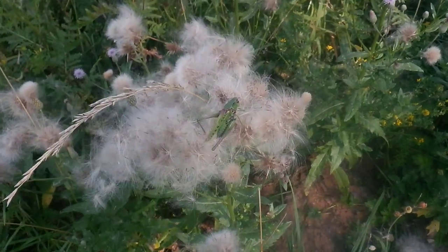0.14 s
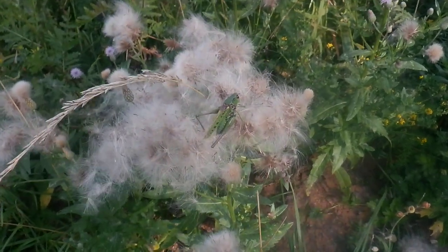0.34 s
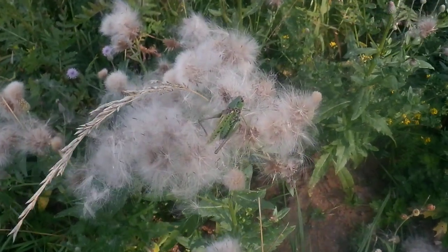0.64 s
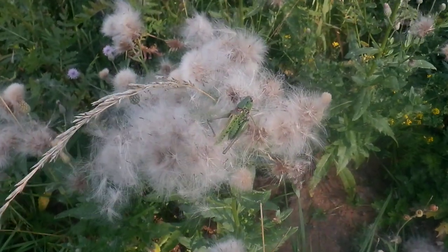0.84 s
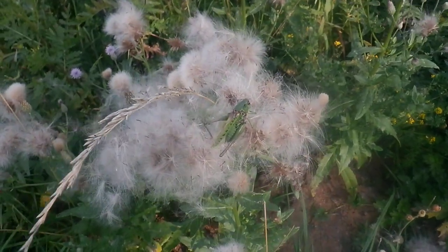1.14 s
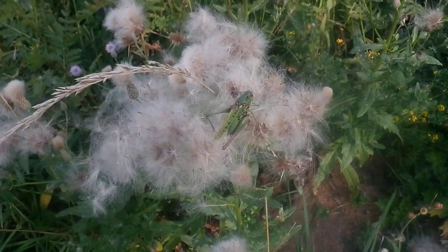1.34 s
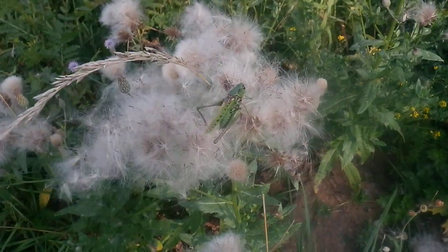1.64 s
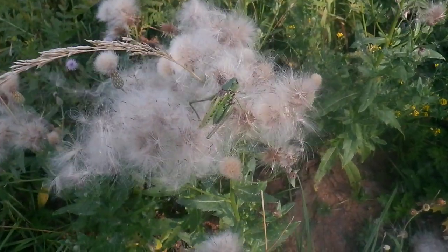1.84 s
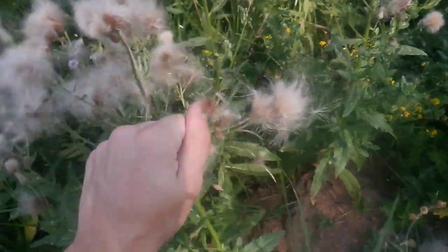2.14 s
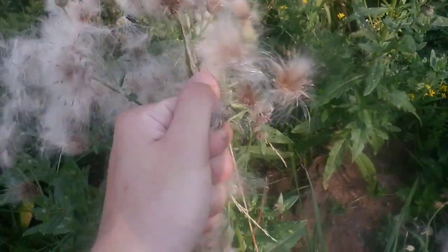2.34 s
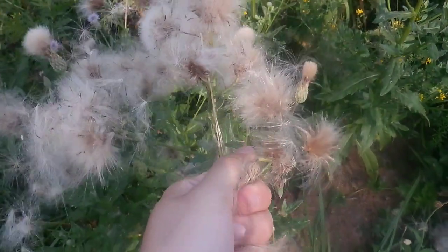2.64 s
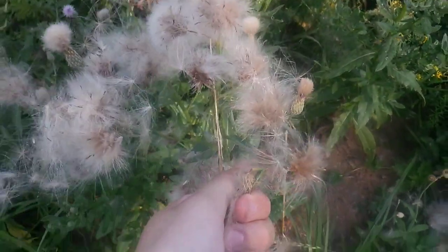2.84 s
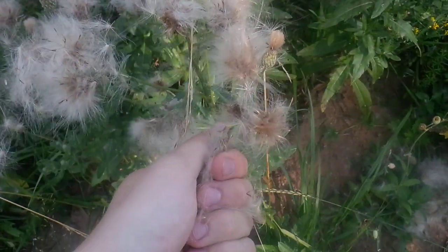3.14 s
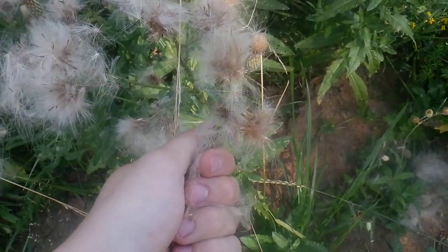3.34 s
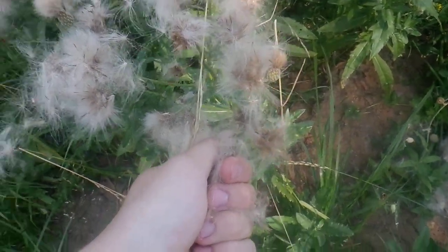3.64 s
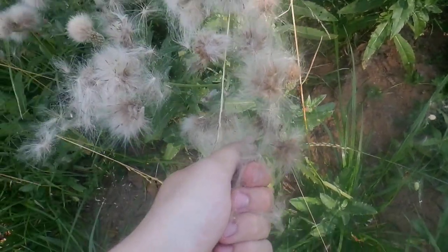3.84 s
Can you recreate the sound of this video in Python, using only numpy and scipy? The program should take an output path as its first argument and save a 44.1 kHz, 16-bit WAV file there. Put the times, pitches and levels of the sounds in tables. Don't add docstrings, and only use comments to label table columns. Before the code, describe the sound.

A bush-cricket chirrs in fast, steady high pulses, then stops as a hand rustles dry stems.

```python
import sys
import numpy as np
from scipy import signal
from scipy.io import wavfile

SR = 44100
rng = np.random.default_rng(int(sys.argv[2]) if len(sys.argv) > 2 else 0)


def store_wav(level_fs):
    pcm = np.round(np.clip(np.atleast_2d(level_fs), -1, 1) * 32767)
    wavfile.write(sys.argv[1], SR, pcm.T.astype(np.int16))


def ratio_of_db(decibels):
    return 10 ** (np.asarray(decibels, float) / 20)


N = 176400

# f/Hz, level/dB per Hz
MEADOW_SPECTRUM = [(35, -26), (60, -7), (96, -0.5), (885, 1), (1810, -7), (2900, -7), (4400, -10.5),
                   (5690, -8.5), (6800, -16.5), (8840, -53), (15000, -120)]
MEADOW_DB, HISS_DB = -54.5, -65.5
PORT_HZ, PORT_WIDTH_HZ, PORT_DB = 2932, 370, -58
# t/s, level/dB
RECORDER_GAIN = [
    (0, -1.5),
    (2.975, -0.83),
    (2.99, -22.5),
    (3.13, -15.5),
    (3.66, -6.5),
    (3.69, -17.5),
    (3.93, -13),
    (3.95, -20),
    (4, -12.5),
]

# t/s, level/dB
WIND_LEVEL = [(0, -58.5), (.55, -76), (.9, -64.5), (1.16, -68), (1.19, -50.5), (1.34, -56), (1.42, -65),
              (1.8, -72.5), (1.9, -53.5), (2.2, -62.5), (2.3, -56.5), (2.65, -52), (2.97, -42), (3.03, -61),
              (3.1, -75.5), (3.6, -68.5), (4, -74)]
# f/Hz, level/dB per Hz
WIND_SPECTRUM = [(12, -60), (20, -18), (76, -0.5), (145, -1.5), (400, -26), (520, -50), (880, -120)]
WIND_LUMP_DB = 4
# t/s, peak level/dB
WIND_PUFFS = [(1.185, -46), (1.208, -42), (1.241, -38), (1.288, -36.5), (1.329, -44), (1.984, -48),
              (2.04, -43.5), (2.176, -40.5), (2.624, -38), (2.668, -43), (2.768, -43), (2.815, -44.5),
              (2.89, -37), (3.014, -65)]
PUFF_HZ, PUFF_S = 141, 0.0244
# t/s, level/dB
GRIP_LEVEL = [(3.62, -75), (3.675, -40), (3.72, -37.5), (3.775, -50), (3.8, -33.5), (3.88, -34.5),
              (3.895, -47.5), (3.93, -51), (3.96, -61)]
# f/Hz, level/dB per Hz
GRIP_SPECTRUM = [(12, -56.5), (20, -23), (156, 2), (908, -24.5), (1800, -39.5), (3000, -61.5),
                 (3900, -74.5), (6600, -120)]

# t/s, level/dB
HAND_LEVEL = [(2.0, -51.5), (2.06, -46), (2.085, -36.5), (2.1, -33), (2.125, -42), (2.24, -44),
              (2.34, -52.5), (2.38, -58), (2.55, -56.5), (2.7, -51), (2.8, -56.5), (2.9, -55.5),
              (2.955, -52.5), (2.968, -40), (2.98, -32.5), (2.99, -66.5), (3.05, -63)]
# f/Hz, level/dB per Hz
RUSTLE_SPECTRUM = [(120, -32), (287, -8.5), (579, -7), (1430, -6), (1790, -10.5), (3000, -5), (5550, -15),
                   (8500, -32), (12000, -46), (15600, -61), (22000, -120)]
# t/s, level/dB
RUB_LEVEL = [(3.4, -70), (3.6, -70), (3.622, -39.5), (3.64, -32.5), (3.672, -36.5), (3.69, -38),
             (3.73, -83), (3.95, -85)]
# f/Hz, level/dB per Hz
RUB_SPECTRUM = [(210, -26), (350, 0.5), (835, -3), (1720, -10), (2070, -10), (9000, -44.5), (11700, -83),
                (19800, -120)]
GRAINS_PER_S, GRAIN_SPREAD_DB, GRAIN_DB = 1100., 4.5, 0.5

# t/s, peak level/dB, pitch f/Hz, length/ms
STEM_SNAPS = [(2.095, -39, 7500, 14), (2.13, -34, 3000, 2.0), (2.524, -40.5, 1080, 2.1),
              (2.579, -32.5, 5100, 2.0), (2.629, -34, 2160, 11.2), (2.629, -39.5, 1430, 9.0),
              (2.706, -36.5, 2900, 18), (2.259, -36, 1450, 65), (2.964, -36, 1200, 7), (3.407, -47, 880, 3),
              (3.9025, -48, 1200, 1.5), (3.96, -54, 1700, 8)]
SNAP_SPAN = 1.153

# t/s, dull level/dB, port level/dB, upper port level/dB
FIBRE_TICKS = [(2.204, -47, -38, -48), (2.328, -55, -45, -44), (2.407, -53, -41, -40),
               (2.494, -55, -50, -41), (2.547, -60, -52, -45), (2.5664, -60, -52, -50),
               (2.6213, -55, -44, -42), (2.68, -55, -48, -41), (2.705, -57, -42, -41),
               (2.716, -57, -45, -44), (2.735, -55, -41, -38), (2.75, -62, -52, -37), (2.76, -60, -50, -44),
               (2.8168, -60, -41, -50), (2.8606, -42, -41, -42), (3.093, -54.5, -54, -66),
               (3.1282, -43.5, -30.5, -54), (3.131, -40, -47, -42.5), (3.258, -65, -58, -56),
               (3.41, -56, -49, -58), (3.5217, -37, -31.5, -30.5), (3.531, -48, -40, -55),
               (3.768, -65, -59, -50), (3.803, -54, -58, -56), (3.82, -56, -56, -55),
               (3.888, -47, -58, -58)]
# f/Hz, t60/s
TICK_RESONANCES = [(1700, 0.0046), (3020, 0.01), (5850, 0.0044)]
TICK_RING_HZ, TICK_RING_DB, TICK_RING_T60_S = 3470, -19, 0.043

# t/s, crack level/dB, ring level under 3 kHz/dB, ring level above/dB
CASING_CLACKS = [
    (2.9823, -12.5, -47, -37),
    (3.6812, -18.5, -35, -30),
    (3.716, -38.5, -55, -49),
    (3.9366, -17, -30, -30),
]
# f/Hz, width/Hz, level/dB
CLACK_CRACKS = [
    [(560, 500, 2), (924, 290, 2), (1330, 310, -1), (2730, 266, 5), (3860, 420, 0), (5500, 410, -5),
     (6000, 450, -8.5), (7240, 890, -12.5), (8140, 400, -9), (9600, 780, -15), (10700, 900, -14),
     (12400, 600, -22), (15300, 1250, -18)],
    [(953, 130, 10), (1490, 190, -1.5), (1900, 280, -1), (2900, 240, -3), (3780, 240, -2), (4580, 350, -2),
     (5220, 220, 0.5), (7570, 700, 2.5), (8900, 900, -9.5), (10100, 1000, -5), (11700, 900, -21),
     (15600, 980, -35)],
    [(2500, 510, 1.5), (3970, 300, -5.5), (5100, 870, 0.5)],
    [(977, 120, 4), (1446, 273, 6.5), (2770, 450, 0.5), (4000, 450, -6), (5260, 450, -4), (7500, 970, -3.5),
     (8300, 900, -7.5), (10600, 1200, -17), (12500, 1500, -18), (14600, 1500, -21)],
]
CRACK_SPREAD_S = .0005
# f/Hz, level/dB, t60/s
CASING_MODES = [(1650, -14.5, .07), (1787, -11, .045), (2078, -0.5, 0.051), (2200, -19.5, .06),
                (3424, -14, 0.03), (3680, -5, 0.04), (4280, -9.5, .05), (4500, -12, 0.04),
                (5560, -19.5, 0.033), (6470, -25, 0.085), (7060, -20.5, 0.057), (6920, -28.5, 0.087),
                (7500, -27.5, .05), (8250, -15.5, 0.017)]
# t/s, peak level/dB
CASING_BUMPS = [
    (3.547, -31.5),
    (3.588, -28),
    (3.626, -9),
    (3.68, -16.5),
    (3.7150, -17),
    (3.935, -21.5),
]
BUMP_HZ, BUMP_T60_S = 440, 0.0053

# t/s, lateness of the closing strokes/ms
CHIRP_TIMES = [(.0491, -.5), (.154, -.2), (.264, .1), (.3744, -.2), (.4862, .1), (.5951, .7), (.7077, .4),
               (.8148, .1), (.917, 0), (1.0224, -.9), (1.1348, .1), (1.2444, .2), (1.35, -.1),
               (1.4604, -.5), (1.5733, .3), (1.6806, .2), (1.7896, .3), (1.9044, 0), (2.0131, -.1)]
LAST_FLICK_S = 2.093
# start t/ms, end t/ms, start level/dB, end level/dB
LOW_WING_STROKES = [(-22.4, -20.5, -22, -11), (-12, -6.2, -32, -16), (-2.6, .2, -19, -9), (.9, 4, -16, -12),
                    (9.2, 9.9, -19, -16), (16, 22.4, -32, -7), (22.4, 25.4, -7, -13),
                    (26.7, 27.3, -14, -13), (28.2, 33.2, -12, -7)]
# start t/ms, end t/ms, start level/dB, end level/dB
HIGH_WING_STROKES = [(-22, -19.8, -24, -23), (-11, -6.2, -35, -20), (-2.6, 1.1, -23, -3),
                     (1.1, 4.1, -2, -3), (9.3, 10, -25, -24), (18.5, 25.1, -29, 1), (28, 33.2, -2, 0)]
# f/Hz, width/Hz, level/dB
LOW_WING_MODES = [(5700, 620, -9), (7850, 890, 0.05), (10060, 1480, 4)]
# f/Hz, width/Hz, level/dB
HIGH_WING_MODES = [(12090, 950, 0.2), (13100, 510, 0), (13870, 1540, 2.5), (15250, 640, -2.5)]
TEETH_PER_S, TEETH_SLOWING, TOOTH_JITTER, TOOTH_SPREAD_DB = 3300., 0.49, 0.29, 2.5
SONG_DB, SONG_RISE_DB_PER_S, LEAF_ECHO_DB, LEAF_ECHO_T60_S = -30.5, 0.95, -38, 0.024

CUTOFF_HZ = 16460


def rms_one(x):
    return x / np.sqrt(np.mean(x ** 2) + 1e-20)


def in_time(rows, outside=None):
    s, db = np.transpose(rows)
    return np.interp(np.arange(N) / SR, s, db, outside, outside)


def drift(rate):
    r = np.exp(-80 * np.pi * rate / SR)
    noise = rng.standard_normal(N // 40 + 2002)
    slow = signal.lfilter([1], [1, -2 * r, r * r], noise)[2000:]
    return np.interp(np.arange(N) / 40, np.arange(len(slow)), rms_one(slow))


def ring(clicks, hz, t60):
    r = ratio_of_db(-60 / (t60 * SR))
    w = 2 * np.pi * hz / SR
    return signal.lfilter([0, np.sin(w)], [1, -2 * r * np.cos(w), r * r], clicks + 1e-18)


def band(x, low_hz, high_hz):
    return signal.sosfilt(signal.butter(2, [low_hz, high_hz], "band", fs=SR, output="sos"), x)


def coloured(source, spectrum, patchy_db, rate):
    hz, db = np.transpose(spectrum)
    edges = hz[0] * 2 ** np.arange(0, np.log2(hz[-1] / hz[0]), 1 / 3)
    together = drift(rate)
    out = 0
    for k, (low, high) in enumerate(zip(edges, edges[1:])):
        level = np.interp(np.log(low * high) / 2, np.log(hz), db)
        flicker = patchy_db * (1.08 * together + 0.78 * drift(rate))
        out = out + ratio_of_db(level + flicker) * band(source[k % 2], low, high)
    return rms_one(out)


def at(s, size):
    x = np.zeros(N)
    x[int(s * SR)] = size
    return x


def place(out, s, shape, db):
    scaled = ratio_of_db(db) * shape / np.abs(shape).max()
    return out + np.pad(scaled, (int(s * SR), N))[:N]


def meadow():
    air = ratio_of_db(MEADOW_DB) * coloured(rng.standard_normal((2, N)), MEADOW_SPECTRUM, patchy_db=1.0, rate=7.0)
    port_level = ratio_of_db(PORT_DB + 1.4 * drift(32.0))
    port = port_level * rms_one(ring(rng.standard_normal(N), PORT_HZ, 3.24 / PORT_WIDTH_HZ))
    hiss = ratio_of_db(HISS_DB) * rms_one(band(rng.standard_normal(N), 4900, 18000))
    return ratio_of_db(in_time(RECORDER_GAIN)) * (air + port + hiss)


def wind():
    noise = coloured(rng.standard_normal((2, N)), WIND_SPECTRUM, patchy_db=WIND_LUMP_DB, rate=10.6)
    out = ratio_of_db(in_time(WIND_LEVEL)) * noise
    t = np.arange(3000) / SR / PUFF_S
    swell = t * np.exp(-4 * t * t)
    for s, db in WIND_PUFFS:
        settled = band(rng.standard_normal(6000), PUFF_HZ / 1.68, PUFF_HZ * 1.7)[3000:]
        puff = band(settled * swell, PUFF_HZ / 1.66, PUFF_HZ * 1.61)
        out = place(out, s - PUFF_S / 4, puff, db)
    return out


def grip():
    rumble = coloured(rng.standard_normal((2, N)), GRIP_SPECTRUM, patchy_db=2, rate=40)
    return ratio_of_db(in_time(GRIP_LEVEL, outside=-120)) * rumble


def friction(curve, spectrum):
    sizes = ratio_of_db(GRAIN_SPREAD_DB * np.minimum(rng.exponential(1, (2, N)), 5))
    sizes = sizes * rng.choice([-1, 1], (2, N))
    lots = rng.random((2, N))
    chance = GRAINS_PER_S * ratio_of_db(3 * drift(60)) / SR
    grains = rms_one(sizes * (lots < chance))
    source = rng.standard_normal((2, N)) + ratio_of_db(GRAIN_DB) * grains
    noise = coloured(source, spectrum, patchy_db=1.5, rate=40)
    favoured = 0.72 * band(noise, 4830, 6340)
    return ratio_of_db(in_time(curve, outside=-120)) * (noise + favoured)


def snaps():
    out = np.zeros(N)
    ms = np.arange(4000) / SR * 1000
    for s, db, hz, length in STEM_SNAPS:
        burst = rng.standard_normal(4000) * np.exp(-(ms / length) ** 2)
        out = place(out, s, band(burst, hz / SNAP_SPAN, hz * SNAP_SPAN), db)
    return out


def ticks():
    out = np.zeros(N)
    click = np.eye(1, 3000)[0]
    for s, *levels in FIBRE_TICKS:
        shape = ratio_of_db(levels[1] + TICK_RING_DB) * ring(click, TICK_RING_HZ, TICK_RING_T60_S)
        for k, (hz, t60) in enumerate(TICK_RESONANCES):
            off_pitch = 1 + .02 * rng.standard_normal()
            shape += (-1) ** k * ratio_of_db(levels[k]) * ring(click, hz * off_pitch, t60)
        out += np.pad(shape, (int(s * SR), N))[:N]
    return out


def bumps():
    pushes = -sum(at(s + 0.00151, ratio_of_db(db)) for s, db in CASING_BUMPS)
    return ring(pushes, BUMP_HZ, BUMP_T60_S)


def clacks():
    out = np.zeros(N)
    click = np.eye(1, 2000)[0]
    for (s, crack_db, *_), crack in zip(CASING_CLACKS, CLACK_CRACKS):
        for k, (hz, width, db) in enumerate(crack):
            start = int((s + CRACK_SPREAD_S * rng.random()) * SR)
            size = (-1) ** k * ratio_of_db(crack_db + db) * width / 300
            out[start:start + len(click)] += size * ring(click, hz, 2.2 / width)
    for hz, level_db, t60 in CASING_MODES:
        taps = np.zeros(N)
        for s, _, low_db, high_db in CASING_CLACKS:
            tap_db = high_db if hz > 3000 else low_db
            taps += at(s, ratio_of_db(tap_db + 2 * rng.standard_normal()))
        out += ratio_of_db(level_db) * ring(taps, hz, t60)
    return out


def tooth_clicks(strokes):
    clicks = np.zeros(N)
    tooth = np.arange(40) * 1000 / TEETH_PER_S
    runs = [(s, late, strokes) for s, late in CHIRP_TIMES] + [(LAST_FLICK_S, 0, strokes[:1])]
    for s, late, played in runs:
        for start, end, start_db, end_db in played:
            length = end - start
            jitter, spread = rng.standard_normal((2, len(tooth)))
            slowed = tooth * (1 + TEETH_SLOWING * tooth / length)
            along = (slowed + TOOTH_JITTER * tooth[1] * jitter) / length
            ms = start + along * length + late * (start > 12)
            db = SONG_DB + SONG_RISE_DB_PER_S * s + start_db + (end_db - start_db) * along
            db = db + TOOTH_SPREAD_DB * spread
            np.add.at(clicks, ((s + ms / 1000) * SR).astype(int), ratio_of_db(db) * (along < 1))
    return clicks


def cricket():
    song = np.zeros(N)
    for strokes, wing in ((LOW_WING_STROKES, LOW_WING_MODES), (HIGH_WING_STROKES, HIGH_WING_MODES)):
        clicks = tooth_clicks(strokes)
        for k, (hz, width, db) in enumerate(wing):
            song += ratio_of_db(db) * (-1) ** k * ring(clicks, hz, 2.2 / width)
    song = signal.sosfilt(signal.butter(4, 4500, "high", fs=SR, output="sos"), song)
    t = np.arange(2000) / SR
    leaves = rng.standard_normal(len(t)) * ratio_of_db(-60 * t / LEAF_ECHO_T60_S)
    return song + ratio_of_db(LEAF_ECHO_DB) * signal.fftconvolve(song, leaves)[:N]


def scene():
    field = cricket() + meadow()
    rubbing = friction(HAND_LEVEL, RUSTLE_SPECTRUM) + friction(RUB_LEVEL, RUB_SPECTRUM)
    low = wind() + grip()
    small = snaps() + ticks()
    knocks = bumps() + clacks()
    return (field + rubbing + low + small + knocks)[None]


def roll_off(x):
    return signal.sosfilt(signal.butter(12, 16810, fs=SR, output="sos"), x)


def record(dry):
    mix = signal.sosfilt(signal.cheby2(8, 30, CUTOFF_HZ, fs=SR, output="sos"), dry)
    return roll_off(mix)


dry = scene()
out = record(dry)
store_wav(out)
```